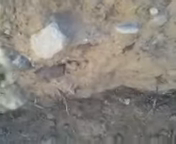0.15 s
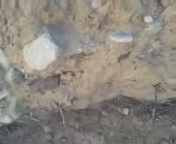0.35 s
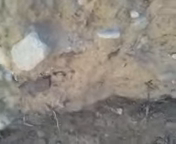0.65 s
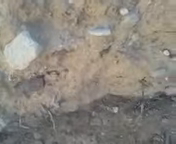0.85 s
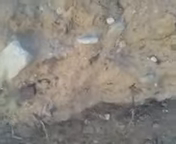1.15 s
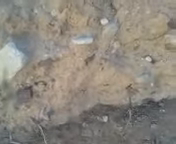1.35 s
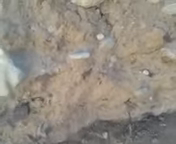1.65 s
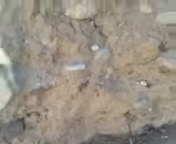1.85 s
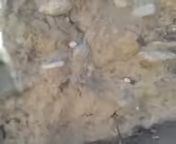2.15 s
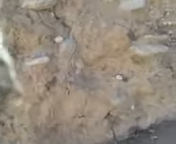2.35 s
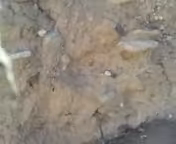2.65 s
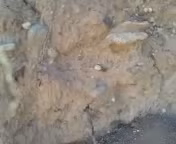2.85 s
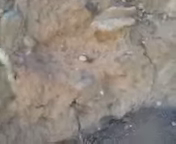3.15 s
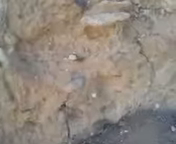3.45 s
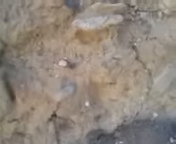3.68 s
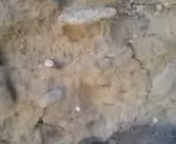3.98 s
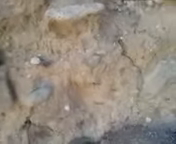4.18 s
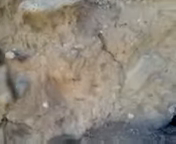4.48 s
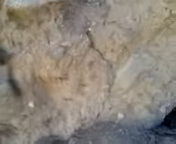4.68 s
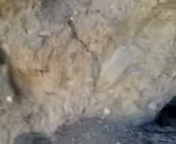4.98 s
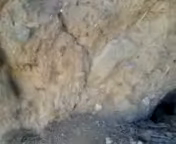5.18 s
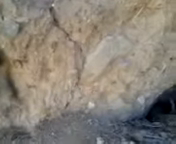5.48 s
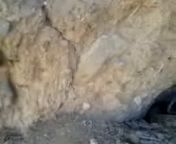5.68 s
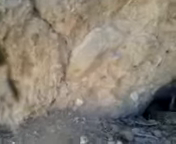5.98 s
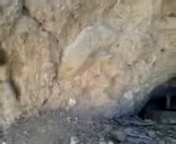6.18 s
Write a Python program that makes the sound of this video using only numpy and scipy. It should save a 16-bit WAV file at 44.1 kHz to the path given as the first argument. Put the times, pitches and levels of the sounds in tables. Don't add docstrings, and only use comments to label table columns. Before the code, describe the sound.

A rattlesnake's tail buzzes continuously, a dry, bright, very fast rattle growing steadily louder, with small hand taps and faint wind on the microphone.

```python
import sys
import numpy as np
from scipy import signal
from scipy.fft import rfft, irfft
from scipy.io import wavfile
from scipy.ndimage import uniform_filter1d

SR = 44100
rng = np.random.default_rng(int(sys.argv[2]) if len(sys.argv) > 2 else 0)


def invert_db(x):
    u = np.asarray(x, float) / 20
    return 10 ** u


def wav_record(signal):
    frames = np.transpose(np.atleast_2d(signal))
    bounded = np.clip(frames, -1, 1)
    quanta = np.round(bounded * 32767).astype(np.int16)
    wavfile.write(sys.argv[1], SR, quanta)


N = 279153

# (time [s], lead [swings])
SWING_LEAD = [(0.0, -0.2), (0.2, 0.44), (0.5, 1.1), (0.8, 1.53), (1.2, 1.95), (1.5, 2.13), (1.6, 2.52),
              (1.8, 2.77), (2.8, 2.75), (3.1, 2.6), (3.6, 2.53), (4.0, 2.37), (4.2, 2.63), (4.4, 2.85),
              (5.0, 4.31), (5.4, 5.29), (6.33, 7.4)]
# (time [s], level [dB])
RATTLE_LEVEL = [(0.0, -40), (0.54, -39.5), (0.93, -38.5), (1.37, -39), (2.4, -37.5), (3.35, -35.5),
                (3.44, -35), (3.5, -35.5), (3.97, -33), (4.2, -33), (5.34, -30.5), (5.43, -32), (5.82, -30),
                (6.33, -30.5)]
# (frequency [Hz], level [dB per Hz])
FAR_COLOUR = [(880, -92.5), (1500, -55.5), (2000, -36.5), (2250, -24), (2800, -15.5), (3250, -20),
              (3520, -13.5), (4290, -13.5), (5020, -7), (5770, -5.5), (8320, 2.5), (10000, -5.5),
              (11800, -11.5), (15100, -9), (16000, -24.5)]
HALF_WAY_COLOUR = [(880, -97), (1500, -33.5), (2100, -31.5), (2440, -21.5), (4040, -17), (4640, -14),
                   (5120, -8.5), (5940, -10), (7390, -0.5), (8000, -10.5), (8740, -1), (9850, -4),
                   (10800, -12), (13900, -15), (16000, -57)]
NEAR_COLOUR = [(880, -94), (1500, -36), (2740, -23), (3480, -21.5), (4000, -12), (4550, -15.5), (4870, -12),
               (5280, -13), (7320, -4), (7840, -5), (8400, -9.5), (9750, -7.5), (12700, -15.5),
               (14600, -15), (16000, -49)]
COLOUR_TIMES = [0.87, 3.3, 5.96]
# (frequency [Hz], width [Hz], depth [dB])
ECHO_NOTCHES = [
    [(2200, 100, 4), (3220, 80, 1), (4280, 170, 7), (4750, 130, 7)],
    [(2100, 100, 3), (3300, 100, 0), (4200, 100, 4), (4720, 130, 9)],
    [(1900, 100, 2), (3520, 110, 4), (4250, 80, 2), (4900, 150, 12)],
]
# (place in swing [0-1], level [dB])
SWING_CHATTER = [(0, 1.6), (.06, 1.6), (.17, -3.5), (.26, -12), (.36, -12), (.46, -4), (.54, -1),
                 (.85, -.8), (1, 1.6)]
# (frequency [Hz], share [1])
SWING_FOLLOW = [(1500, 0.3), (3000, 1.1), (5500, 1.0), (7000, 1.3), (10000, 1.7), (11500, 1.05),
                (16000, 1.6)]
# (place in swing [0-1], spread [swings], pitch [Hz], pitch spread [octaves],
# left swing [dB], right swing [dB])
SEGMENT_KNOCKS = [(.05, .05, 8700, .08, 6, 3), (.06, .05, 9700, .06, 2.5, 6), (.07, .05, 11800, .06, 3, 8),
                  (.06, .05, 14300, .12, 4.5, 5.5), (.03, .055, 7300, .1, 5, 3.5),
                  (.52, .055, 5600, .15, 7, 8), (.7, .05, 10000, .1, 3, 5), (.87, .06, 4000, .15, 6.5, 2),
                  (.82, .06, 2800, .2, 3, 6), (.5, .07, 3100, .25, 4, 4), (.08, .08, 3400, .35, -2, -6)]
# (time [s], peak [dB], pitch factor [1], time to fade 60 dB [s], scuff share [0-1])
HAND_TAPS = [(.17, -51, .35, .05, .7), (1.822, -48, .25, .12, .7), (1.878, -47, .42, .11, .7),
             (1.91, -52, .6, .05, .8), (2.06, -58, .6, .15, .95), (2.988, -46, .75, .03, .3),
             (3.05, -29, 1, .024, .12), (3.39, -57, .7, .25, .95), (3.771, -51, .6, .07, .9),
             (4.518, -44, .72, .03, .15), (4.935, -41, 1.06, .025, .15), (6.259, -60, .95, .04, .6)]
# (frequency [Hz], level [dB])
CASE_MODES = [(480, -9), (630, -5), (877, -14), (1141, 0), (1380, -16), (1940, -18)]
# (time [s], peak [dB], frequency [Hz])
AIR_PUFFS = [(0.031, -44, 59), (2.407, -45.5, 51.3), (2.44, -47.5, 71), (3.522, -42, 44.8),
             (3.727, -56, 36.8), (4.269, -53.5, 26)]
# (frequency [Hz], level [dB per Hz])
WIND_COLOUR = [(8.8, -19), (15, 11), (43, -0.5), (203, -19), (300, -24.5), (390, -36.5), (660, -120)]
# (middle [s], half length [s], peak [dB])
WIND_GUSTS = [(0.0, .015, -40), (0.126, 0.051, -62.5), (0.44, 0.24, -64.5), (1.21, 0.15, -74),
              (1.733, 0.096, -62), (2.266, 0.054, -65), (2.428, 0.059, -56), (2.834, 0.13, -64),
              (3.037, 0.027, -54), (3.165, 0.063, -59), (3.527, 0.19, -60.5), (3.752, 0.14, -59.5),
              (4.075, 0.11, -72), (4.28, 0.038, -58), (5.02, 0.14, -63.5), (5.283, 0.035, -74),
              (5.85, .15, -64.5), (6.277, 0.061, -75)]
# (frequency [Hz], level [dB per Hz])
HISS_COLOUR = [(120, 0), (250, -3), (500, -7.5), (1000, -8), (2000, -7), (5000, -27), (16000, -19)]
# (frequency [Hz], threshold [dB per bin])
DROWN_LEVEL = [(60, -66.5), (200, -51), (400, -51), (1000, -52.5), (1400, -56), (2200, -50.5), (3000, -56),
               (16000, -60)]
# (frequency [Hz], step [dB])
GRAIN_STEP = [(100, -14), (400, -6), (800, .5), (1500, 3.5), (4500, 5.5), (6500, 4), (8500, 1), (10000, 3),
              (11000, 8.6), (15500, 8.8)]
# (middle [s], half length [s], rise of threshold [dB])
THIN_MOMENTS = [(1.05, .04, 4), (2.515, .04, 12), (2.635, .02, 9), (2.865, .02, 9), (2.945, .018, 11),
                (3.01, .012, 9), (3.12, .03, 6), (3.19, .03, 6), (3.3, .05, 5), (3.6, .1, 5),
                (3.86, .04, 10), (4.1, .2, 4), (4.36, .02, 8), (4.43, .05, 4), (4.67, .03, 6),
                (5.01, .04, 5), (5.19, .03, 10), (5.32, .025, 9), (5.6, .15, 4), (5.84, .02, 7),
                (6.03, .035, 11)]


def evened(x):
    return x / np.sqrt(np.mean(x ** 2) + 1e-20)


def read(points, hz):
    f, value = np.transpose(points)
    return np.interp(np.log(hz + 1), np.log(f + 1), value)


def curve(rows):
    s, value = np.transpose(rows)
    return np.interp(np.arange(N) / SR, s, value)


def bump(t, middle, half):
    return np.exp(-((t - middle) / half) ** 2)


def add(mix, s, sound):
    part = mix[max(round(s * SR), 0):][:len(sound)]
    part += sound[:len(part)]


def coloured(x, db_of_hz):
    gain_db = np.maximum(db_of_hz(np.fft.rfftfreq(4096, 1 / SR)), -100)
    cepstrum = irfft(np.log(invert_db(gain_db)))
    cepstrum[1:2048] *= 2
    cepstrum[2049:] = 0
    return signal.oaconvolve(x, irfft(np.exp(rfft(cepstrum))))[:N]


def knock_ring(hz):
    cycles, linger = 8, .05
    u = np.arange(round(60 * SR / hz)) * hz / SR / cycles
    fade = u * np.exp(-4 * u) + linger * u * np.exp(-1.5 * u)
    ring = fade * np.sin(2 * np.pi * u * cycles)
    return ring / np.linalg.norm(ring) * np.sqrt(hz)


def knocks():
    swings_per_s, knocks_per_s = 63.4, 2000
    turns = swings_per_s * np.arange(N) / SR + curve(SWING_LEAD)
    place, swing = turns % 1, np.floor(turns + .65).astype(int)
    swing_db = 1.3 * np.interp(place, *np.transpose(SWING_CHATTER))
    force_db = .45 * rng.standard_normal(500)[swing]
    force_db = force_db + .7 * evened(uniform_filter1d(rng.standard_normal(N), size=40))
    out = np.zeros(N)
    for hz in np.geomspace(1500, 16500, num=66):
        hit = np.flatnonzero(rng.random(N) < knocks_per_s / SR)
        db = read(SWING_FOLLOW, hz) * (swing_db[hit] + force_db[hit])
        for at, spread, segment_hz, octaves, *side_db in SEGMENT_KNOCKS:
            time_off = ((place[hit] - at + .5) % 1 - .5) / spread
            pitch_off = np.log2(hz / segment_hz) / octaves
            closeness = np.exp(-(time_off ** 2 + pitch_off ** 2) / 2)
            db = db + np.array(side_db)[swing[hit] % 2] * closeness
        size_db = 1.6 * np.minimum(rng.exponential(1, len(hit)), 3.8)
        train = np.zeros(N)
        train[hit] = invert_db(db + size_db) * rng.choice([-1, 1], len(hit))
        out += signal.oaconvolve(train, knock_ring(hz))[:N]
    return evened(out)


def rattle():
    x, out = knocks(), np.zeros(N)
    colours = [FAR_COLOUR, HALF_WAY_COLOUR, NEAR_COLOUR]
    for k, (colour, notches) in enumerate(zip(colours, ECHO_NOTCHES)):
        def shape(hz):
            cut_db = sum(db * bump(hz, f, width) for f, width, db in notches)
            return read(colour[:-1], hz) - cut_db

        share = np.interp(np.arange(N) / SR, COLOUR_TIMES, np.eye(3)[k])
        out += share * evened(coloured(x, shape))
    return invert_db(curve(RATTLE_LEVEL)) * out


def handling():
    out, t = np.zeros(N), np.arange(4000) / SR
    for s, db, hz in AIR_PUFFS:
        push = 4.8 * t * hz * 2.8 * np.exp(-t * hz * 3.24)
        add(out, s, -invert_db(db) * push * np.cos(2 * np.pi * hz * t))
    for s, db, pitch, t60, scuff in HAND_TAPS:
        ring = sum(invert_db(mode_db) * np.sin(2 * np.pi * hz * pitch * t) for hz, mode_db in CASE_MODES)
        band = signal.butter(2, [250 * pitch, 1500 * pitch], "band", fs=SR)
        rub = evened(signal.lfilter(*band, rng.standard_normal(len(t))))
        fade = invert_db(db - 4 - 60 * t / t60) * np.minimum(t / .001, 1)
        add(out, s, fade * ((1 - scuff) * ring + scuff * rub))
    return out


def air():
    breeze_db, hiss_db = -72, -65
    wind = evened(coloured(rng.standard_normal(N), lambda hz: read(WIND_COLOUR, hz)))
    hiss = evened(coloured(rng.standard_normal(N), lambda hz: read(HISS_COLOUR, hz)))
    t = np.arange(N) / SR
    blow = invert_db(breeze_db) + sum(invert_db(db) * bump(t, s, half) for s, half, db in WIND_GUSTS)
    return blow * wind + invert_db(hiss_db) * hiss


def scene():
    return (rattle() + handling() + air())[None]


def thinned(x):
    top_hz, wander_spread_db = 15790, 2.5
    n, k = np.arange(2048)[:, None] + .5, np.arange(768) + .5
    basis = np.sin(np.pi * n / 2048) * np.cos(np.pi / 1024 * (n + 512) * k) / np.sqrt(512)
    blocks = np.pad(x, (1024, 2048 - N % 1024)).reshape(-1, 1024)
    c = np.hstack([blocks[:-1], blocks[1:]]) @ basis
    hz, t = k * SR / 2048, np.arange(len(c)) * 1024 / SR
    power = (c ** 2).reshape(len(c), -1, 8).mean(2)
    total = (c ** 2).sum(1)[:, None] + 1e-15
    wander = evened(uniform_filter1d(rng.standard_normal(power.shape), size=3, axis=0))
    band_db = 10 * np.log10(power / total + 1e-15) + wander_spread_db * wander
    rise_db = -.9 + 1.0 * rng.standard_normal(len(t))
    rise_db = rise_db + sum(db * np.minimum(2 * bump(t, s, half), 1) for s, half, db in THIN_MOMENTS)
    drown_db = read(DROWN_LEVEL, hz) + rise_db[:, None] * np.clip((2700 - hz) / 1100, 0, 1)
    nearby = uniform_filter1d(uniform_filter1d(c ** 2, size=48), size=3, axis=0)
    step = invert_db(read(GRAIN_STEP, hz)) * np.sqrt(nearby + 1e-20)
    c = np.sign(c) * np.floor(abs(c) / step + .4) * step
    c = c * (np.repeat(band_db, 8, axis=1) > drown_db) * (hz < top_hz)
    frames = c @ basis.T
    return (frames[1:, :1024] + frames[:-1, 1024:]).ravel()[:N]


def top_cut(x):
    return signal.sosfilt(signal.butter(12, 16330, fs=SR, output="sos"), x)


def record(dry):
    mix = thinned(dry[0])[None]
    return top_cut(mix)


dry = scene()
out = record(dry)
wav_record(out)
```